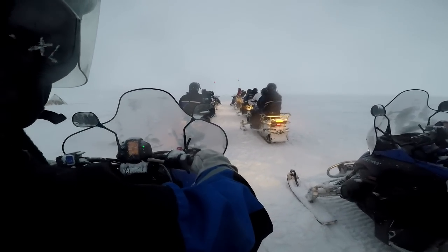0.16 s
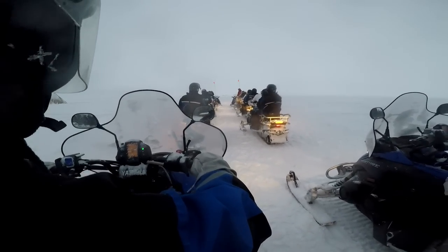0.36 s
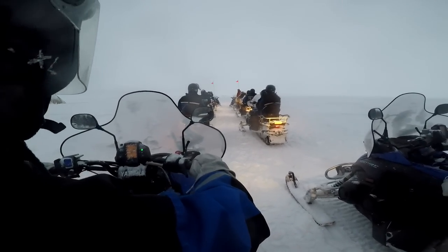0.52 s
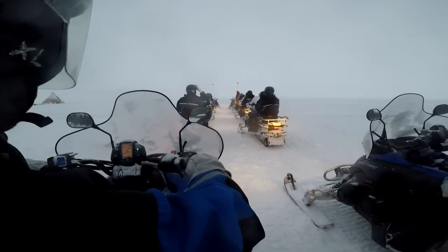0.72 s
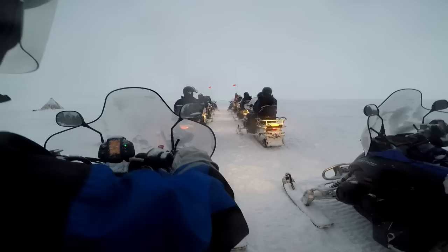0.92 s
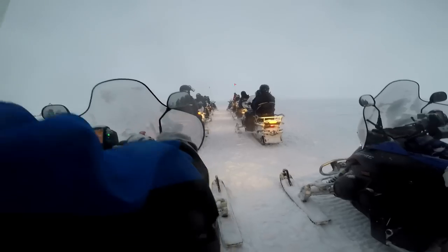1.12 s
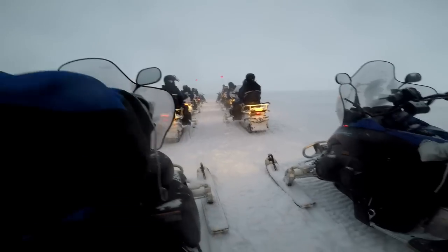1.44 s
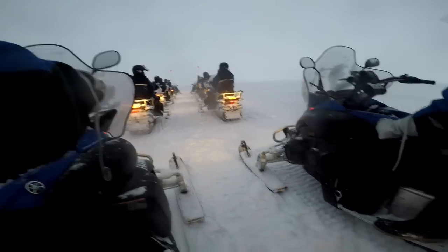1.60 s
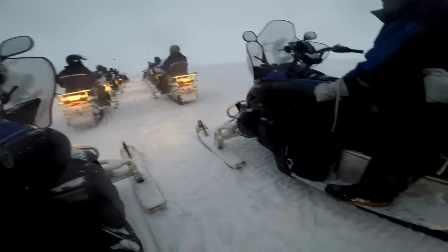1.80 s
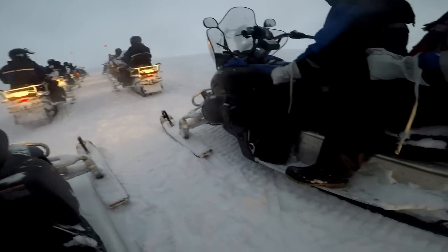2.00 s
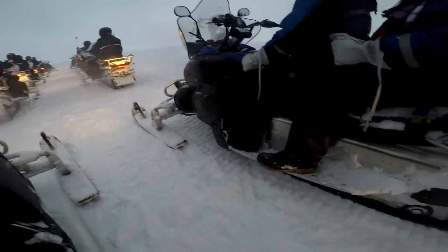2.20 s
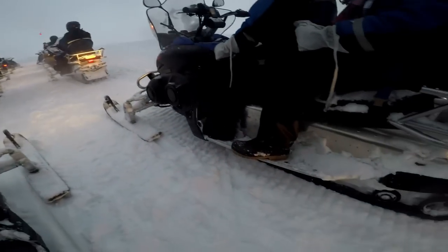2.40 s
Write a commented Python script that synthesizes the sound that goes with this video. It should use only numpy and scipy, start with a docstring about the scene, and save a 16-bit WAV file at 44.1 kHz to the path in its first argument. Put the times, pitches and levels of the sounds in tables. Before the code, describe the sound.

A snowmobile idles steadily outdoors on open snow, a deep booming hum with a fast throb, soft fan hiss and faint casing rattle; the rider's small bumps and cloth ticks come close to the microphone.

```python
"""On open snow, in a line of machines, a snowmobile idles, heard from its seat.
Harmonics of the engine cycle beat together into the exhaust's boom and throb; knocks ring the casing.
Belts and fans hiss as shaped noise. A neighbour at almost the same speed adds overtones and rasping puffs.
The rider turns round: short bursts of noise give soft bumps on the seat and ticks of jacket cloth."""
import sys
import numpy as np
from scipy import signal
from scipy.fft import rfft, irfft
from scipy.io import wavfile
from scipy.ndimage import uniform_filter1d

SR = 44100
rng = np.random.default_rng(int(sys.argv[2]) if len(sys.argv) > 2 else 0)


def generate_wav(sig):
    """Save sig (samples, or channels by samples) to the path in sys.argv[1] as 16-bit PCM at SR."""
    pcm = np.round(np.clip(np.atleast_2d(sig).T, -1, 1) * 32767).astype(np.int16)
    wavfile.write(sys.argv[1], SR, pcm)


N = 112454
T, HZ = np.arange(N) / SR, np.fft.rfftfreq(N, 1 / SR)  # time axis [s], frequency axis [Hz]

# Phase by which the left channel leads the right: (frequency [Hz], phase [rad])
LEFT_LEAD = [(60, 0.8), (130, -0.1), (200, -0.26), (280, -.5), (400, -0.5), (600, -2), (1000, -2),
             (1300, -3), (1800, 1.3), (2400, -1.6), (4200, -0.7), (5200, -1.45), (6500, -2), (8000, -3.5),
             (10000, -1.3)]

# Belts and fans: relative noise spectrum (frequency [Hz], density [dB per Hz])
HISS_SPECTRUM = [(100, -5.5), (400, -1.5), (600, 2.5), (950, -3.5), (1400, 3.5), (1850, 1), (2300, -2),
                 (3000, -3.5), (4200, -7), (5400, -4.5), (6300, -10), (7000, -15.5), (7600, -14.5),
                 (8100, -26.5), (9000, -24), (10500, -33.5), (12500, -43.5), (15000, -50.5)]
# Hiss course before the common trim: (time [s], level [dB], left minus right [dB])
HISS_COURSE = [(0, -33, -5), (.15, -37, -4), (.55, -39, -4), (.8, -38, -2.5), (.95, -36.5, -5.5),
               (1.15, -36, -4), (1.4, -34.5, -4), (1.62, -33.5, -3.5), (1.9, -34.5, -1.5), (2.05, -36, -1),
               (2.55, -37.5, 0)]
# Balance of the hiss over the spectrum: (frequency [Hz], left minus right [dB])
HISS_BALANCE = [(300, 19.5), (600, 6), (800, 1), (1100, -3.5), (2000, -1), (2700, -2.5), (3800, 0.5),
                (5200, 1), (6500, 6), (9000, -4.5)]
# Left-right likeness of the hiss: (frequency [Hz], likeness [0-1])
HISS_LIKENESS = [(100, 0.41), (400, 0.23), (750, 0.63), (1100, 0.73), (1500, 0.17), (2000, .4),
                 (2800, 0.38), (4000, 1), (5200, 0.54), (6500, .3), (7600, 0.43), (10000, .15)]
HISS_TRIM_DB, HISS_FLICKER_DB, HISS_COLOUR_DB = 2, 0.64, 1.0
HISS_THROB_DEPTH, HISS_THROB_PEAK = 0.1, 0.37  # share of the amplitude; place in the cycle

# Soft bumps of the rider on the seat: (time [s], length [s], level [dB])
SEAT_BUMPS = [(.35, 0.045, -31), (.85, 0.035, -43), (1.97, 0.025, -27.5), (2.02, 0.026, -25),
              (2.25, 0.17, -33.5)]
# Relative spectrum of a bump: (frequency [Hz], density [dB per Hz])
BUMP_SPECTRUM = [(60, -17), (200, 2.5), (320, -1), (500, -10), (800, -19.5), (1400, -27.5), (4000, -63)]
BUMP_PAN_DB = 11  # left minus right
# Ticks of stiff jacket cloth: (time [s], length [s], level [dB])
CLOTH_TICKS = [(.775, .006, -37), (.953, .004, -29), (.98, 0.0026, -44), (1.0, 0.0028, -46)]
# Relative spectrum of a tick: (frequency [Hz], density [dB per Hz])
TICK_SPECTRUM = [(500, -10), (1700, 22), (3000, -9), (7000, -6), (11000, -14), (14000, -28)]

NEIGHBOUR_HZ, NEIGHBOUR_FIRST_S = 22.525, 0.004074  # cycles a second, first beat
NEIGHBOUR_TRIM_DB = 0.5
# The neighbour's weaker exhaust partials before trim and swells: (multiple of the cycle rate, level [dB])
WEAK_PARTIALS = [(1, -42.5), (2, -44), (6, -38.5), (7, -31), (8, -33), (9, -38.5), (10, -45.5), (11, -51),
                 (12, -41), (13, -53.5), (14, -68), (15, -60), (16, -48.5), (17, -48), (18, -58.5)]
# Swell of the partials below LOW_GROUP_TO_HZ: (time [s], level [dB])
LOW_SWELL = [(0, 1.5), (.25, 0), (.62, -2.5), (.85, 4), (1.0, 1), (1.2, -1), (1.42, 9.5), (1.7, 0.5),
             (1.95, -10), (2.2, -2), (2.55, 5)]
# Swell of the partials between the two group limits: (time [s], level [dB])
MIDDLE_GROUP_SWELL = [(0, -2.5), (.3, 3), (.5, 1), (.75, -8.5), (1.05, 7), (1.33, 6.5), (1.6, -8.5),
                      (1.8, -5), (2.0, -0.5), (2.25, -2), (2.55, -0.5)]
# Rasp: swell of the partials from RASP_FROM_HZ up and of the puffs: (time [s], level [dB])
RASP_SWELL = [(0, 2.5), (.32, -0.5), (.5, -0.5), (.74, -4.5), (.86, 1), (1.1, -1.5), (1.48, 5), (1.75, 1),
              (2.0, 2), (2.28, 0), (2.55, 2)]
LOW_GROUP_TO_HZ, RASP_FROM_HZ = 168, 215
WAVER_DB = 1.4  # separate wavering of each weak partial
# Gas rushing out with each beat, relative spectrum: (frequency [Hz], density [dB per Hz])
PUFF_SPECTRUM = [(20, -19.5), (60, 1.5), (150, -4), (240, 0.5), (400, -7.5), (600, -18), (1000, -15.5),
                 (3000, -60)]
PUFF_DB, PUFF_PAN_DB, PUFF_LIKENESS = -33, 5.5, 0.31  # level before the rasp; left minus right; 0-1
PUFF_DECAY, PUFF_FLOOR = 0.88, 0.45  # decay in cycles; gas noise that goes on between beats
# The brighter edge of each puff, relative spectrum: (frequency [Hz], density [dB per Hz])
BARK_SPECTRUM = [(150, -21), (300, -3.5), (400, -2.5), (550, 2.5), (750, -12.5), (1100, -25), (3000, -47.5)]
# Course of that edge: (time [s], level [dB])
BARK_COURSE = [(0, -44), (.6, -51.5), (.9, -50.5), (1.25, -43.5), (1.5, -44), (1.85, -40), (2.1, -41),
               (2.55, -47.5)]
BARK_PLACE, BARK_WIDTH = 0.18, .17  # peak and half-width in cycles

# Knocks in each cycle: (place in the cycle [0-1], relative level in low ring [dB], in high ring [dB])
CYCLE_KNOCKS = [(.06, -13, 0), (.18, 1, -21), (0.388, -3, 3.5), (.69, -2, 3.5)]
KNOCK_SPREAD_DB, KNOCK_JITTER_S = 2.5, .0012
KNOCK_RATTLE, KNOCK_DECAY = 0.015, 0.3  # strength of the noise after a knock; its decay in cycles
LOW_RING_HZ, LOW_RING_WIDTH_HZ, LOW_RING_DB, LOW_RING_PAN_DB = 1248, 33, -44, -16
# Casing modes of the high ring: (frequency [Hz], width [Hz], relative level [dB])
HIGH_MODES = [(1560, 29, 6.5), (1648, 58, 1)]
# High ring before its trims: (time [s], level [dB], left minus right [dB])
HIGH_RING_COURSE = [(0, -37.5, -16), (.3, -39.5, -21), (.75, -41.5, -12.5), (1.0, -37.5, -22),
                    (1.25, -33.5, -17), (1.58, -34.5, -15.5), (1.87, -34, -7), (2.02, -41, -8.5),
                    (2.55, -38.5, -10)]
HIGH_RING_TRIM_DB, HIGH_RING_PAN_TRIM_DB = -0.5, -2.5

CYCLE_HZ, FIRST_S = 22.6, .005  # engine cycles a second, first exhaust beat
SPEED_WANDER = 0.0018  # unevenness as a share of the speed
PIPE_HZ, PIPE_WIDTH_HZ = 108.7, 28.2  # the silencer's resonance
PHASE_SLIP = 0.18  # slow wander of each partial's phase [rad]
# The strongest exhaust partials, third to fifth: each (time [s], level [dB])
THIRD_PARTIAL = [(0, -22.5), (.5, -33), (.72, -40.5), (.95, -30), (1.329, -22), (1.6, -45), (1.76, -36.5),
                 (2.05, -43), (2.3, -25.5), (2.55, -23)]
FOURTH_PARTIAL = [(0, -10.5), (.25, -11.5), (.8, -15.5), (.94, -14.5), (1.12, -15.5), (1.27, -16),
                  (1.35, -21), (1.44, -13), (1.75, -12.5), (2.1, -12), (2.35, -13), (2.55, -14.5)]
FIFTH_PARTIAL = [(0, -28), (.1, -28), (.4, -18.5), (.75, -15.5), (.97, -19), (1.2, -18.5), (1.35, -20.5),
                 (1.58, -16.5), (2.03, -17.5), (2.2, -24), (2.4, -23), (2.55, -29)]
# Balance of the exhaust partials: (frequency [Hz], left minus right [dB])
EXHAUST_BALANCE = [(40, 8.5), (100, 2.5), (170, 7.5), (260, 4.5), (420, 10)]

BAND_EDGE_HZ = 14000


def amp(db):
    """Logarithmic level: decibels to amplitude gain."""
    return 10 ** (np.asarray(db) / 20)


def evened(x):
    """Normalisation of power: scales to rms 1."""
    return x / np.sqrt(np.mean(x ** 2) + 1e-20)


def read(points, hz):
    """Interpolation of a spectrum on a logarithmic frequency axis."""
    f, value = np.transpose(points)
    return np.interp(np.log(hz + 1), np.log(f), value)


def curves(rows):
    """Linear interpolation in time: one curve for each column after the first."""
    s, *columns = np.transpose(rows)
    return [np.interp(T, s, column) for column in columns]


def pan(db):
    """Level difference between the ears: left and right gains of mean 1."""
    half = np.atleast_1d(db) / 2
    left, right = amp(half), amp(-half)
    return 2 * np.array([left, right]) / (left + right)


def drift(rate_hz):
    """Low-passed Gaussian noise: slow random motion of rms 1."""
    lowpass = (HZ > 0) * np.exp(-(HZ / rate_hz) ** 2)
    return evened(irfft(rfft(rng.standard_normal(N)) * lowpass, N))


def ring(x, hz, width_hz):
    """Resonance: a single peak filter, scaled to rms 1."""
    b, a = signal.iirpeak(hz, hz / width_hz, SR)
    return evened(signal.lfilter(b, a, x))


def pair(points, same):
    """Partial coherence: left and right spectra that share a portion of one noise, out of step by LEFT_LEAD."""
    a, b = rfft(rng.standard_normal((2, N)))
    same = np.clip(same, -1, 1)
    shared = same * a * np.exp(-1j * read(LEFT_LEAD, HZ))
    right = shared + np.sqrt(1 - same ** 2) * b
    return np.array([a, right]) * amp(read(points, HZ))


def cycles(rate_hz, first_s):
    """Integration of speed: engine cycles counted from the first beat, at a slightly uneven rate."""
    return rate_hz * (T - first_s + SPEED_WANDER * np.cumsum(drift(12)) / SR)


def partial(turns, k, db):
    """Harmonic k of the exhaust beats, with the phase lag of the silencer's two resonant chambers."""
    hz = k * CYCLE_HZ
    lag = 2 * np.arctan(PIPE_HZ / PIPE_WIDTH_HZ * (hz / PIPE_HZ - PIPE_HZ / hz))
    lead = read(LEFT_LEAD, hz) * np.array([[.5], [-.5]])
    angle = 2 * np.pi * k * turns - lag + PHASE_SLIP * drift(2.4) + lead
    return np.sqrt(2) * amp(db) * np.cos(angle) * pan(read(EXHAUST_BALANCE, hz))


def hiss(turns):
    """Broadband noise of belts and fans, modulated by the engine and coloured by bodywork reflections."""
    # random ripples over frequency stand for the reflections
    ripples = rng.standard_normal((2, len(HZ)))
    colour = np.array([evened(uniform_filter1d(c, size=300)) for c in ripples])
    spectra = pair(HISS_SPECTRUM, read(HISS_LIKENESS, HZ))
    air = irfft(spectra * pan(read(HISS_BALANCE, HZ)) * amp(HISS_COLOUR_DB * colour), N)
    air = air / air.mean(0).std()  # the mean of both channels gets rms 1
    level, side = curves(HISS_COURSE)
    throb = 1 + HISS_THROB_DEPTH * np.cos(2 * np.pi * (turns - HISS_THROB_PEAK))
    flicker = HISS_FLICKER_DB * drift(60)
    return air * throb * amp(level + HISS_TRIM_DB + flicker) * pan(side)


def bursts(rows, spectrum):
    """Friction and soft contact: shaped noise under brief Gaussian envelopes."""
    swell = sum(amp(db) * np.exp(-((T - s) / length) ** 2) for s, length, db in rows)
    return evened(irfft(pair(spectrum, same=0.32), N)) * swell


def rider():
    """Contact noise of the turning rider: dull bumps on the seat, bright ticks of stiff cloth."""
    return bursts(SEAT_BUMPS, BUMP_SPECTRUM) * pan(BUMP_PAN_DB) + bursts(CLOTH_TICKS, TICK_SPECTRUM)


def overtones(turns):
    """Harmonic series: the weaker partials swell in three frequency groups, and each wavers by itself."""
    (low,), (middle,), (rasp,) = curves(LOW_SWELL), curves(MIDDLE_GROUP_SWELL), curves(RASP_SWELL)
    out = 0
    for k, db in WEAK_PARTIALS:
        hz = k * CYCLE_HZ
        if hz < LOW_GROUP_TO_HZ:
            swell = low
        elif hz < RASP_FROM_HZ:
            swell = middle
        else:
            swell = rasp
        out = out + partial(turns, k, db + NEIGHBOUR_TRIM_DB + swell + WAVER_DB * drift(1.8))
    return out


def gas_puffs(turns):
    """Turbulent gas flow: noise gated once per cycle, with a brighter edge on every beat."""
    (rasp,), (edge,) = curves(RASP_SWELL), curves(BARK_COURSE)
    gate = uniform_filter1d(np.exp(-(turns % 1) / PUFF_DECAY), size=150) + PUFF_FLOOR
    puffs = evened(irfft(pair(PUFF_SPECTRUM, PUFF_LIKENESS), N) * gate) * amp(PUFF_DB + rasp)
    from_peak = (turns - BARK_PLACE + .5) % 1 - .5  # cycles
    burst = np.exp(-(from_peak / BARK_WIDTH) ** 2)
    bark = evened(irfft(pair(BARK_SPECTRUM, same=1.0), N) * burst) * amp(edge)
    return (puffs + bark) * pan(PUFF_PAN_DB)


def neighbour():
    """Periodic excitation by a second, slightly slower engine: overtones and rasping puffs of gas."""
    turns = cycles(NEIGHBOUR_HZ, NEIGHBOUR_FIRST_S)
    return overtones(turns) + gas_puffs(turns)


def clatter(turns):
    """Impact excitation of resonances: knocks and their rattle, near set places in the cycle, ring the casing."""
    low, high = np.zeros((2, N))
    for place, low_db, high_db in CYCLE_KNOCKS:
        at = turns - place + KNOCK_JITTER_S * CYCLE_HZ * drift(20)
        blows = np.diff(np.floor(at), prepend=np.floor(at[0]))  # an impulse at each whole cycle
        rattle = KNOCK_RATTLE * np.exp(-(at % 1) / KNOCK_DECAY) * rng.standard_normal(N)
        knock = (blows + rattle) * amp(KNOCK_SPREAD_DB * drift(11))
        low = low + amp(low_db) * knock
        high = high + amp(high_db) * knock
    # a broad resonance follows the narrow ones in both rings
    level, side = curves(HIGH_RING_COURSE)
    modes = evened(sum(amp(db) * ring(high, hz, width) for hz, width, db in HIGH_MODES))
    high = ring(modes, hz=1566, width_hz=190)
    high = high * amp(level + HIGH_RING_TRIM_DB) * pan(side + HIGH_RING_PAN_TRIM_DB)
    low = ring(ring(low, LOW_RING_HZ, LOW_RING_WIDTH_HZ), LOW_RING_HZ, width_hz=470)
    return high + low * amp(LOW_RING_DB) * pan(LOW_RING_PAN_DB)


def exhaust(turns):
    """Beating of neighbouring harmonics: three strong partials make the deep, throbbing boom."""
    strong = ((3, THIRD_PARTIAL), (4, FOURTH_PARTIAL), (5, FIFTH_PARTIAL))
    return sum(partial(turns, k, curves(course)[0]) for k, course in strong)


def scene():
    """Superposition of the hiss, the rider, the neighbour and the near engine."""
    turns = cycles(CYCLE_HZ, FIRST_S)
    return hiss(turns) + rider() + neighbour() + clatter(turns) + exhaust(turns)


def record(dry):
    """Band limitation: a linear-phase low-pass filter, centred so that it adds no delay."""
    lowpass = signal.firwin(255, BAND_EDGE_HZ, window=("kaiser", 9), fs=SR)
    return signal.oaconvolve(dry, lowpass[None], "same")


dry = scene()
out = record(dry)
generate_wav(out)
```